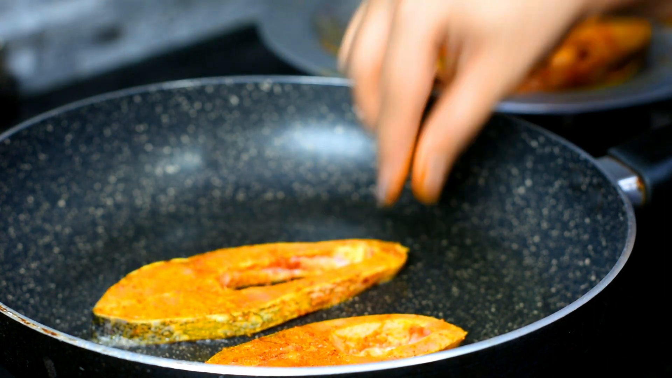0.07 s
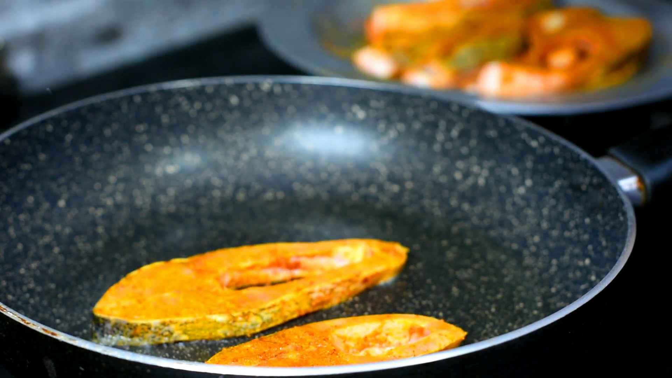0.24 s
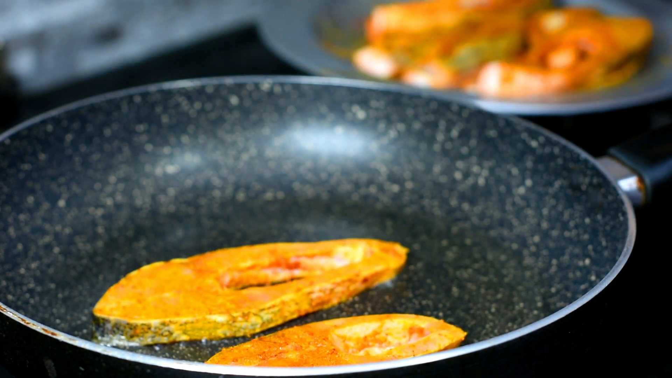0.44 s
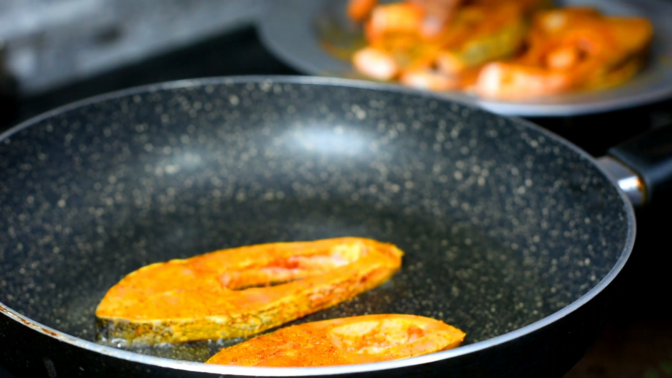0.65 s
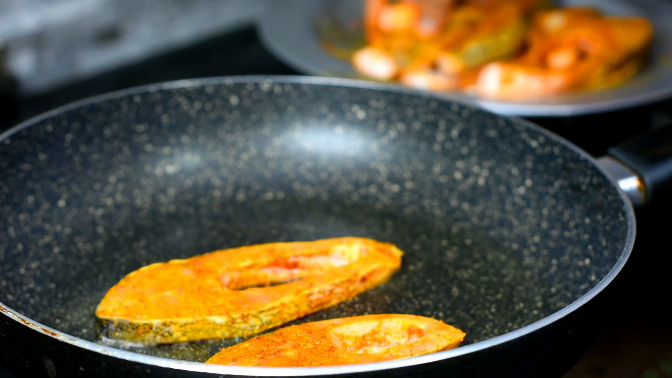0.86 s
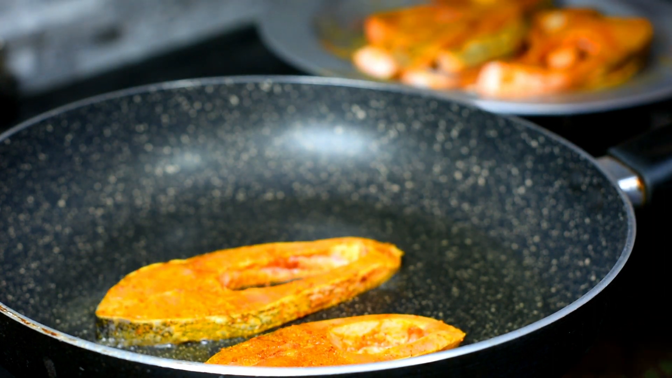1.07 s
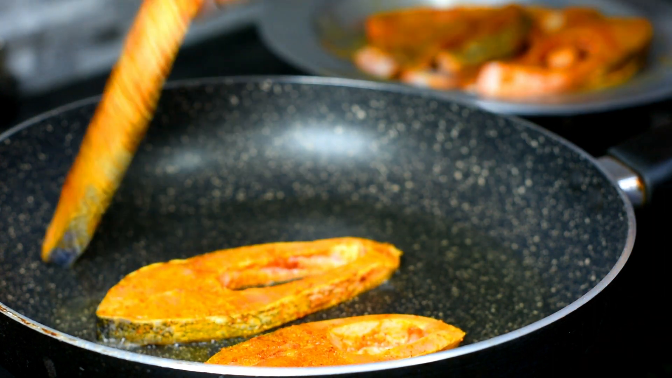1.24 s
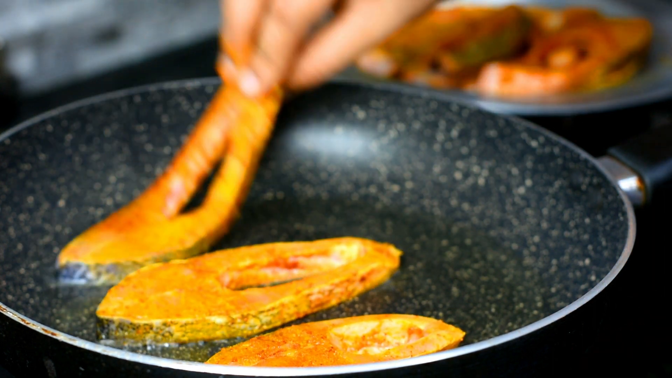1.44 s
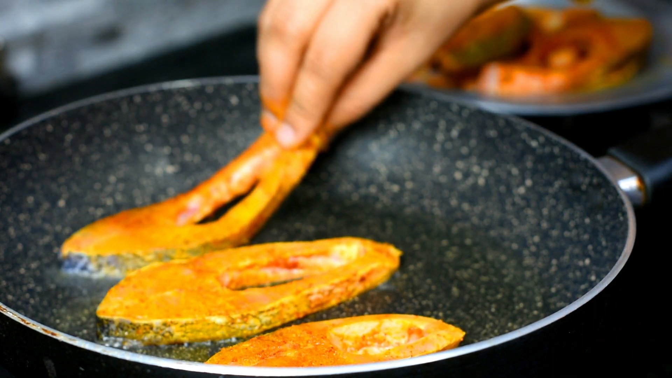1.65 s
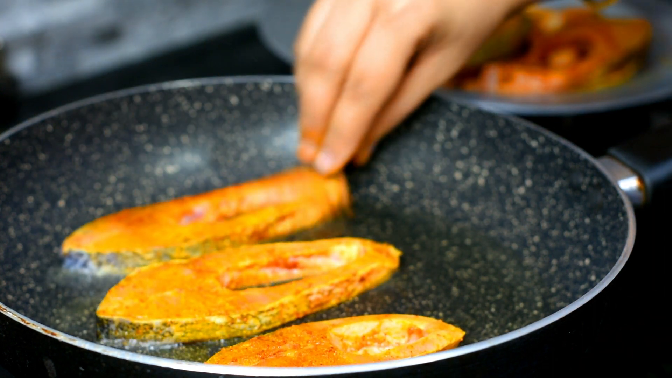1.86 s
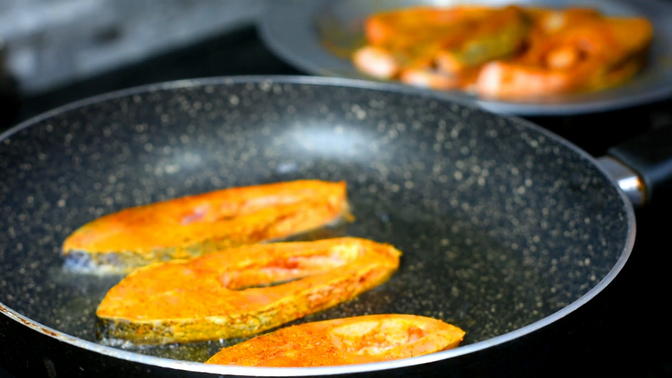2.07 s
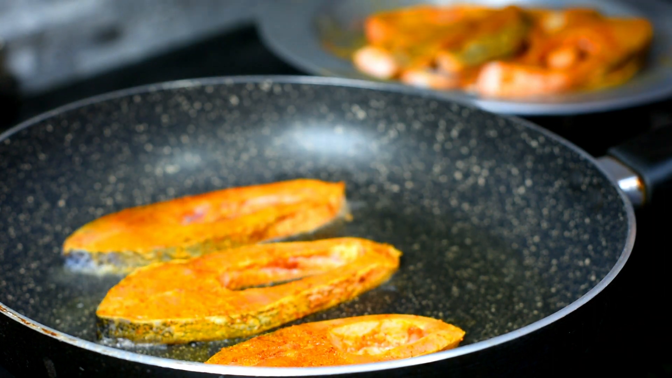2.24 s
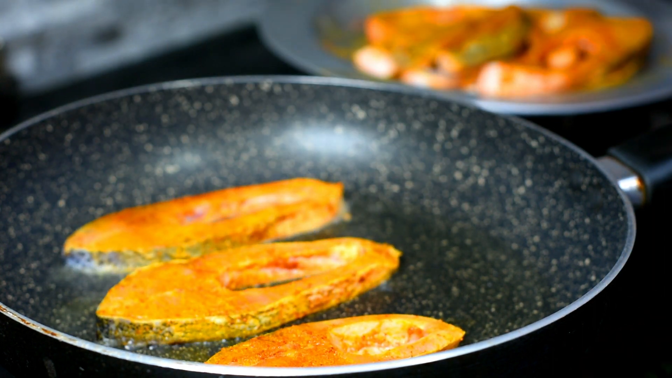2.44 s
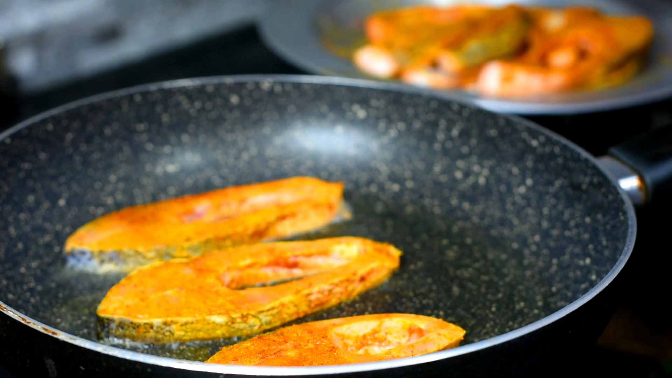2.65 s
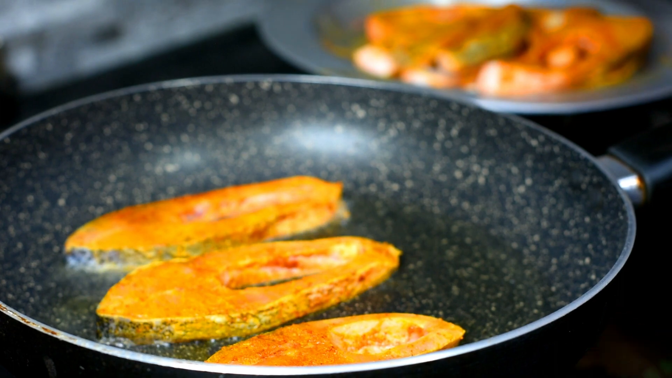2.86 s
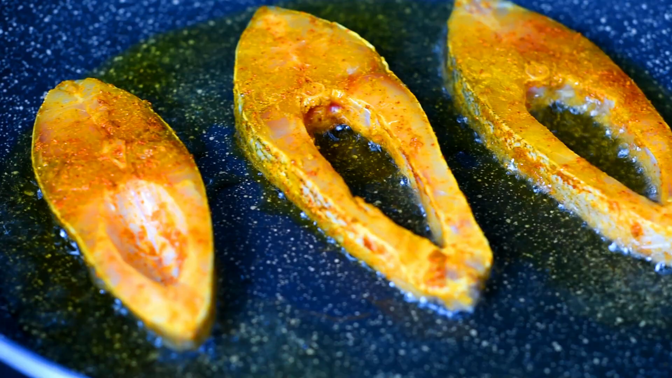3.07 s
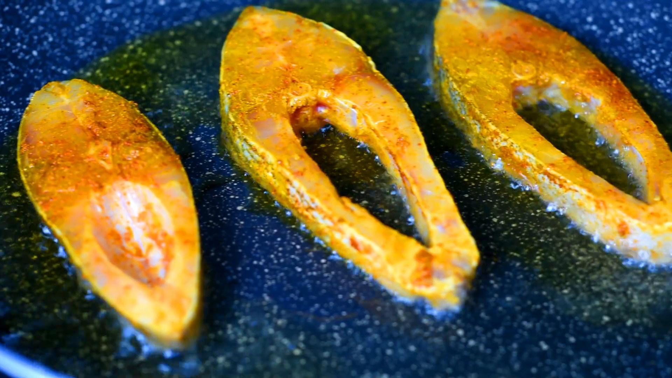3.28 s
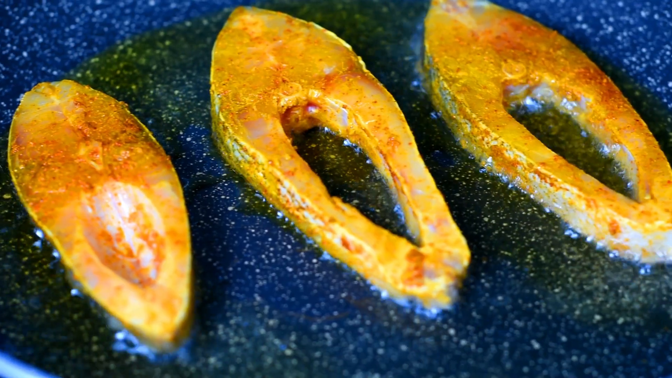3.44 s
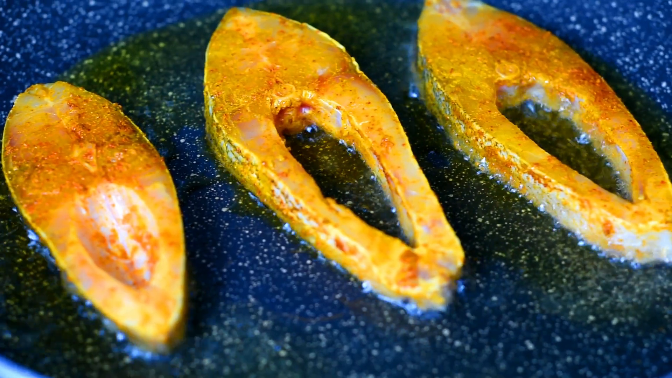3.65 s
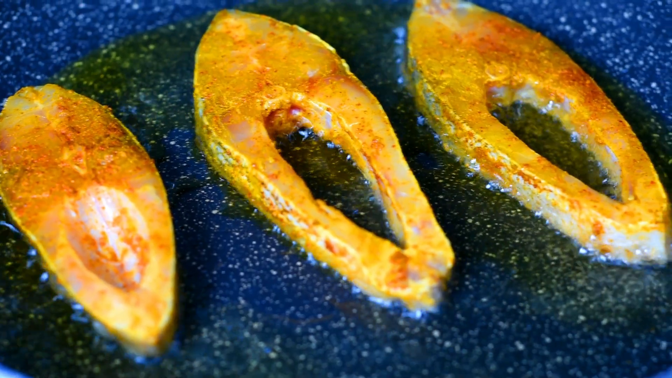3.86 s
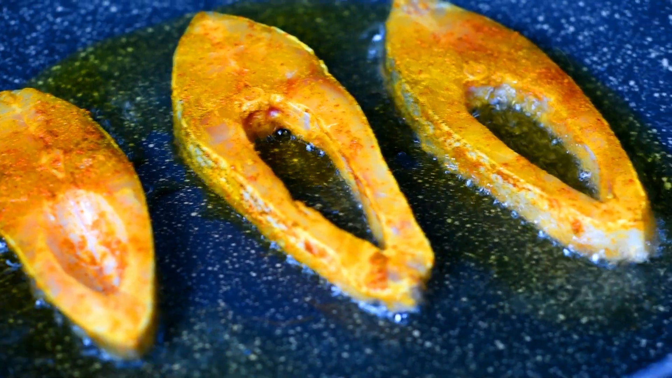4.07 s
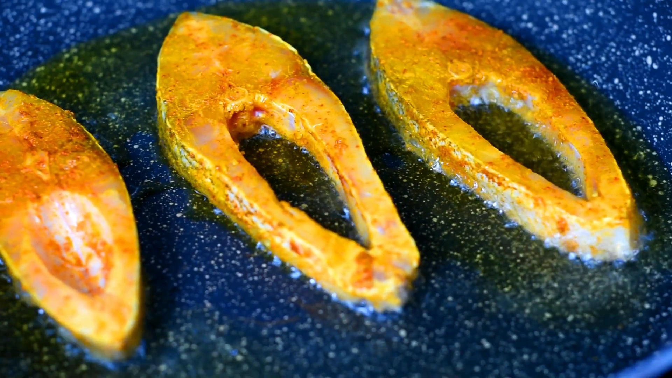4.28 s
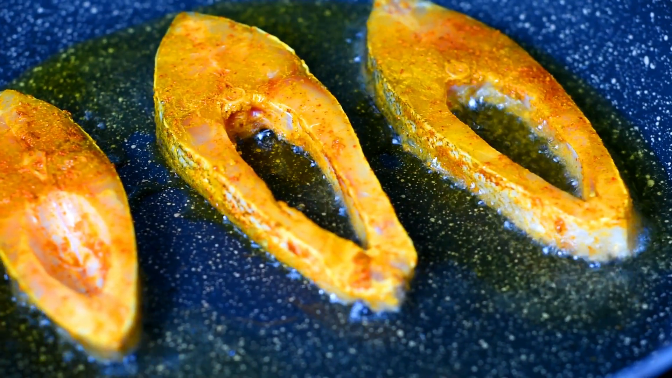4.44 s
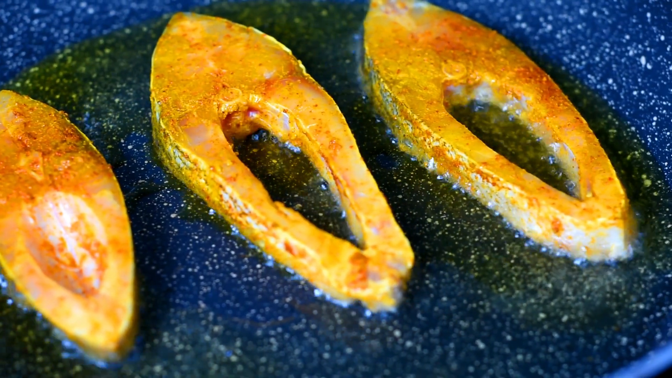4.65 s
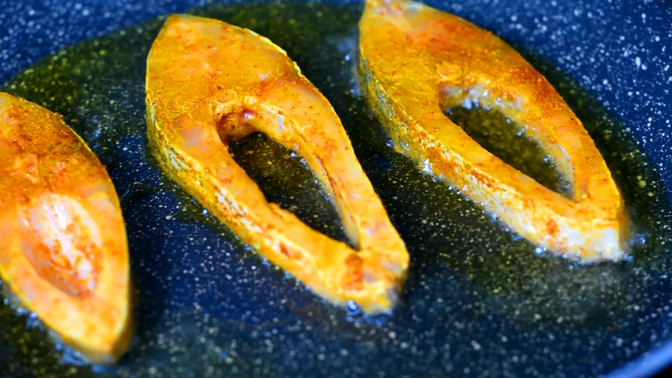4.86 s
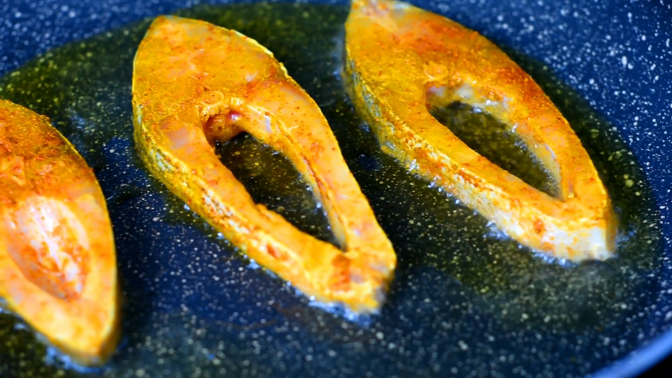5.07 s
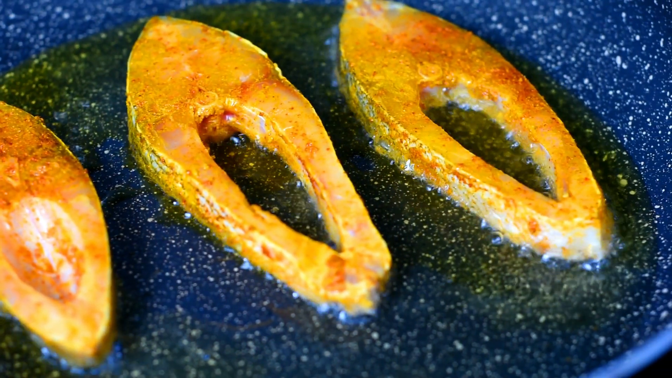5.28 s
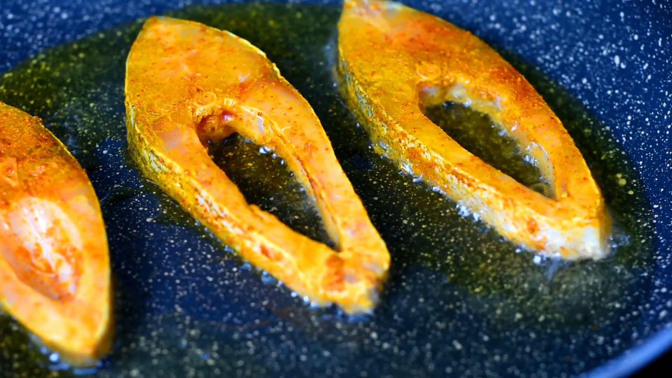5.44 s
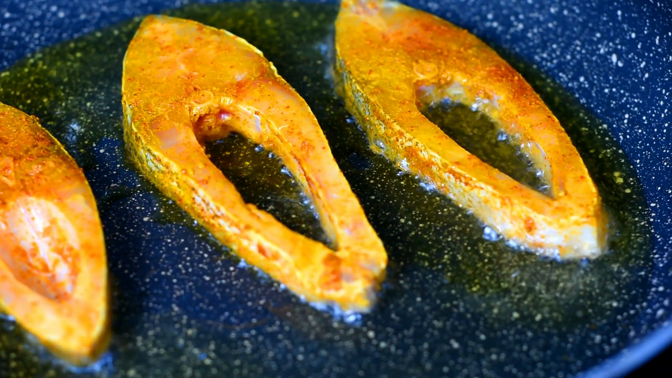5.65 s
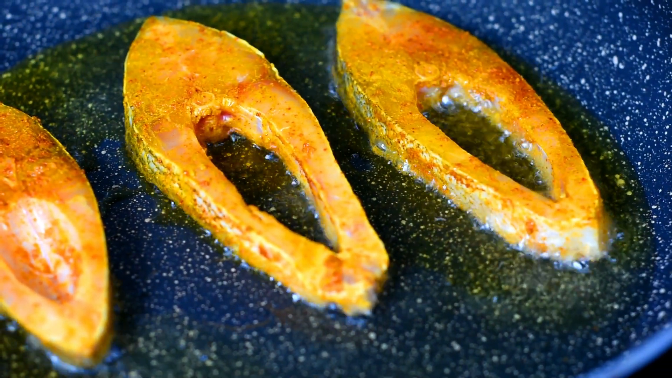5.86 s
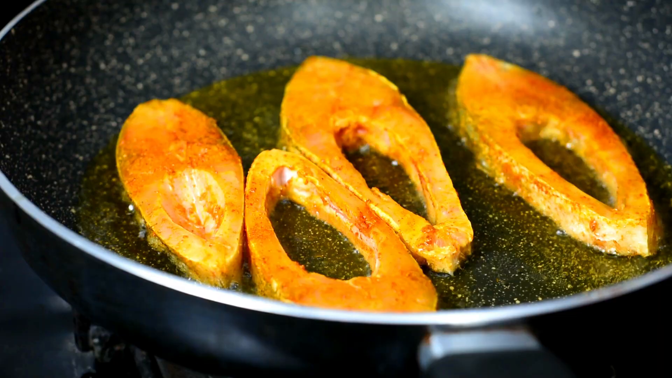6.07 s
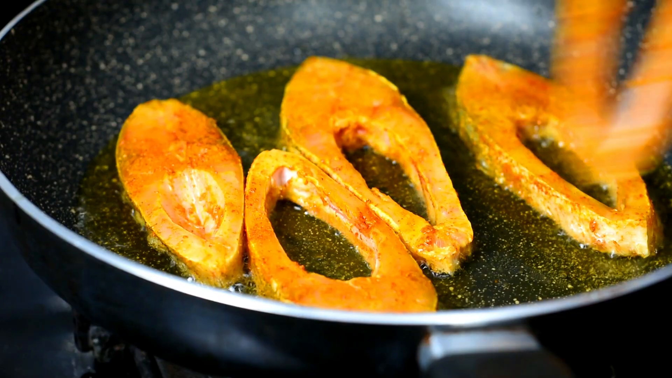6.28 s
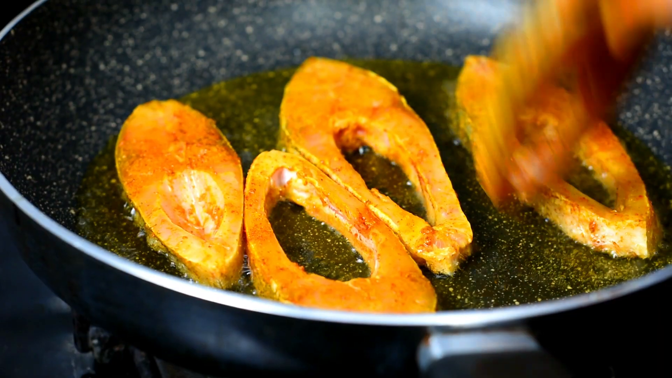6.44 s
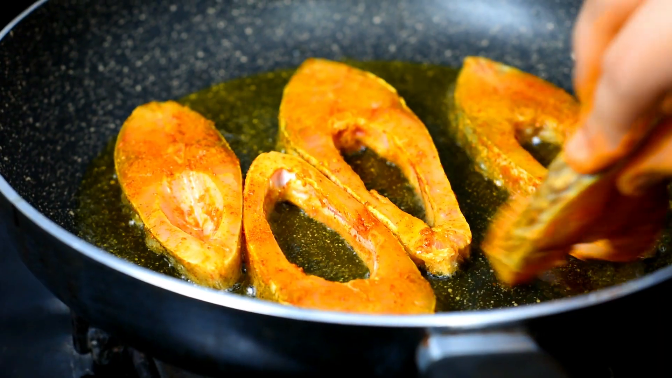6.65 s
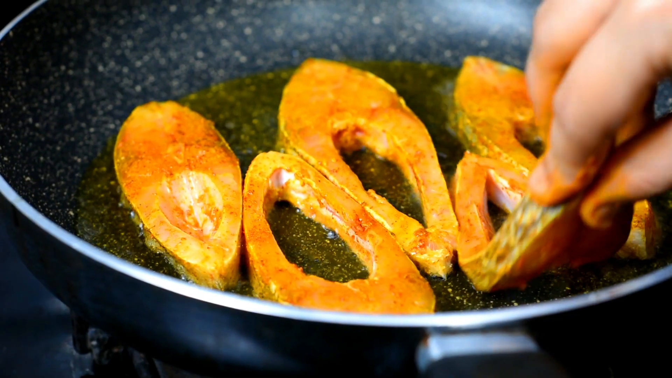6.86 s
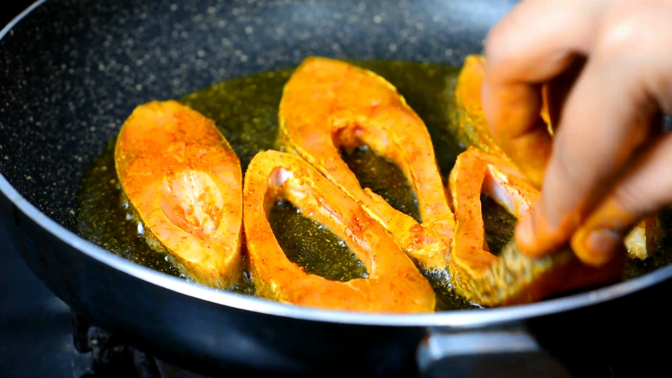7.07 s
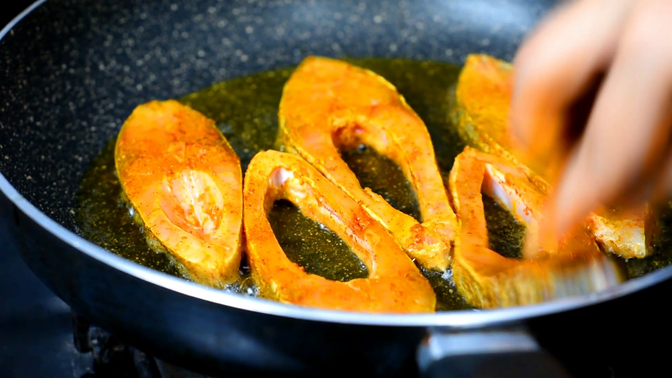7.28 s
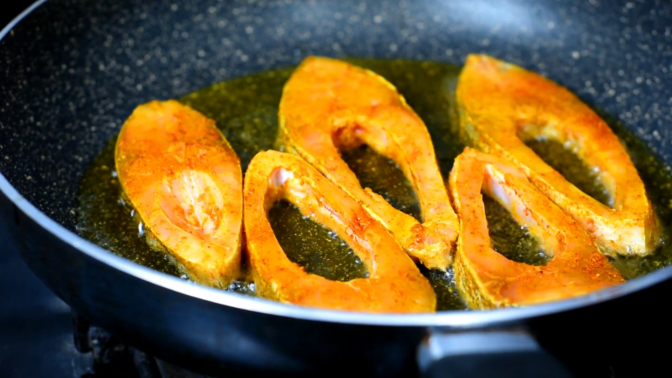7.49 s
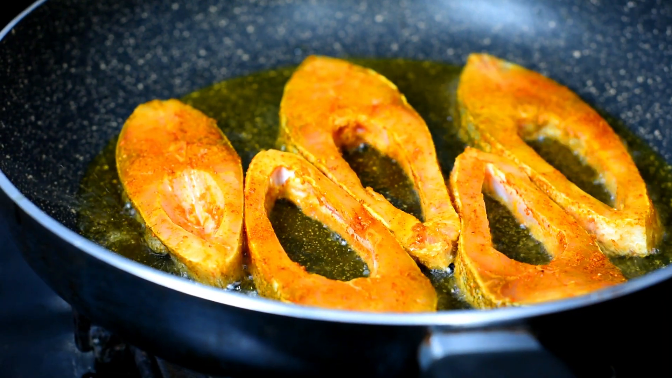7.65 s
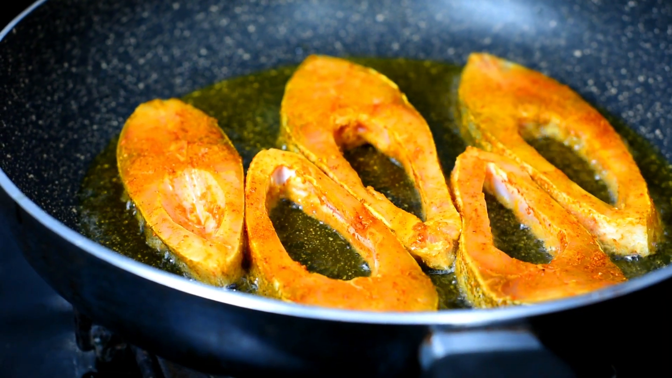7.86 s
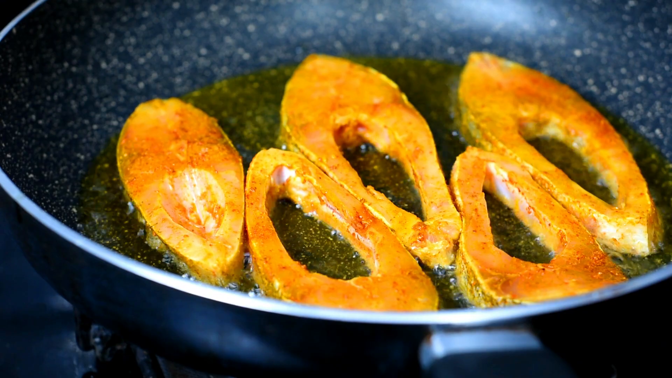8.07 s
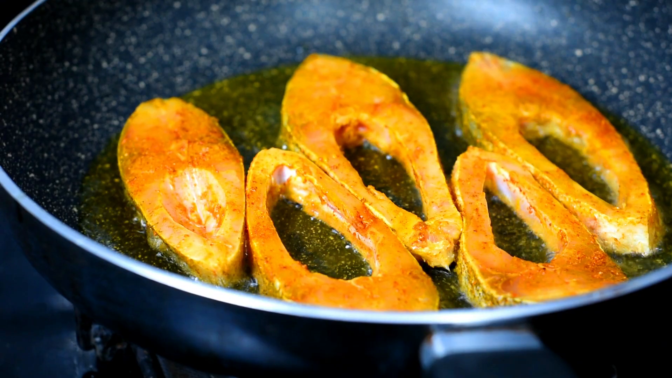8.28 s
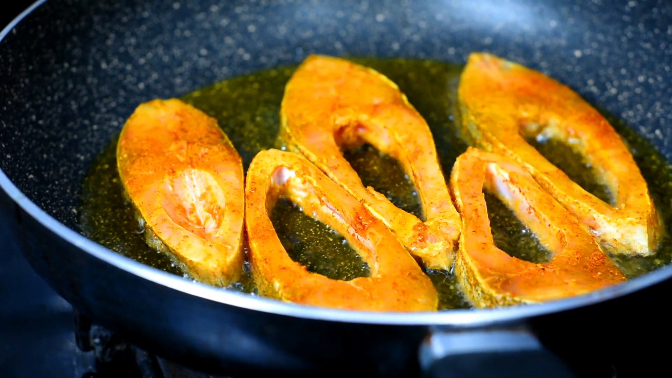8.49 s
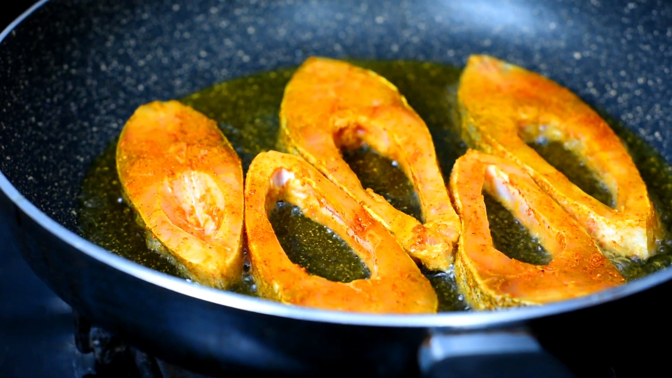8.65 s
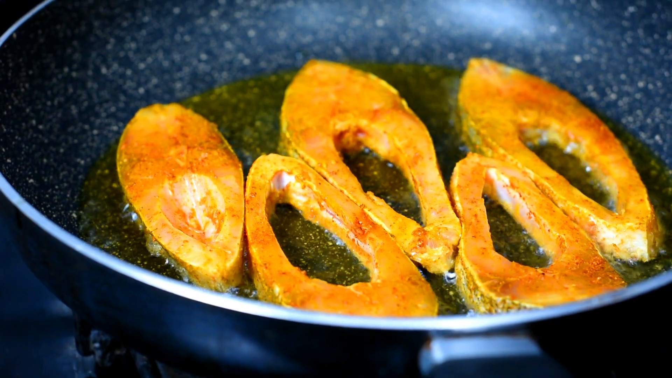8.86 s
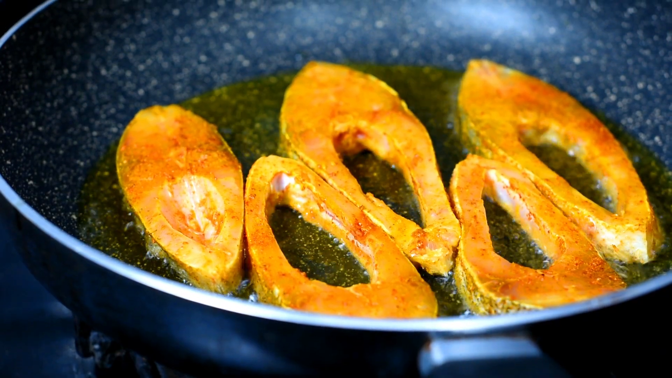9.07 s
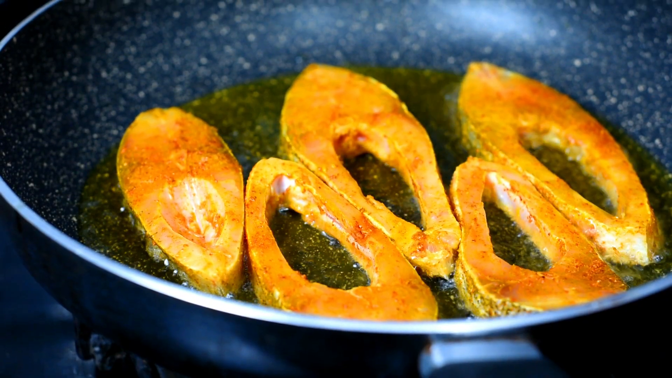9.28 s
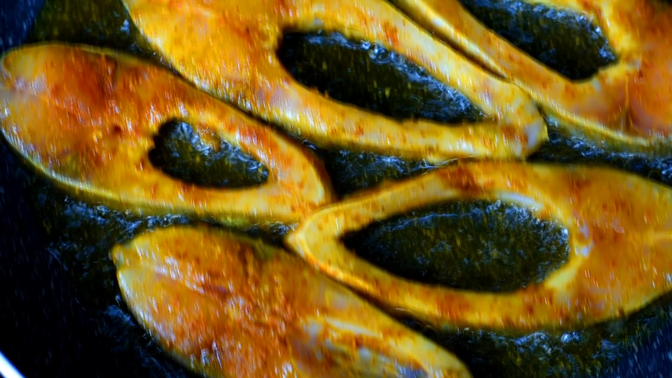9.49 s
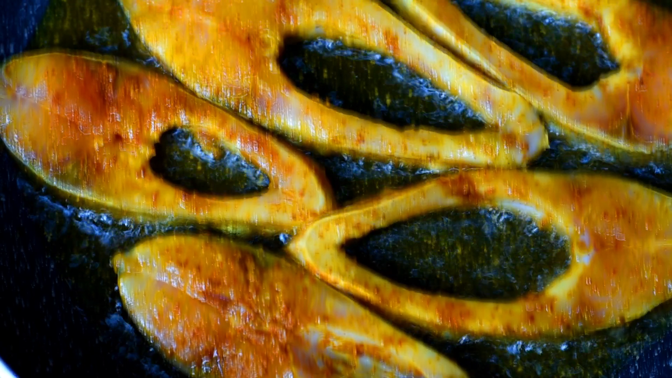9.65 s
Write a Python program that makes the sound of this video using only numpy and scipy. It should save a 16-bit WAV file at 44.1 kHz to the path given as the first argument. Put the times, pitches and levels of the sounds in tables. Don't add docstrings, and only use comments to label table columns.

```python
import sys
import numpy as np
from scipy import signal
from scipy.fft import rfft, irfft, next_fast_len
from scipy.io import wavfile
from scipy.ndimage import uniform_filter1d

SR = 44100
rng = np.random.default_rng(int(sys.argv[2]) if len(sys.argv) > 2 else 0)


def to_linear_factor(level_db):
    exponent = np.asarray(level_db, float) / 20
    return 10 ** exponent


def unload_wav(signal):
    wavfile.write(
        sys.argv[1],
        SR,
        np.round(np.clip(np.atleast_2d(signal).T, -1, 1) * 32767).astype(np.int16),
    )


N = 428652

# [start/s, end/s]
SHOTS = [
    (0, 3.0552),
    (3.0552, 9.4202),
    (9.4592, 9.72),
]
# [t/s, peak level/dB, bubble f/Hz, top octave re peak/dB, knock re peak/dB]
SPITS = [(0.582, -1.5, 4000, -12, -41), (1.0169, -9.5, 6700, -25, -33), (2.7247, -6, 10420, -6, -32),
         (2.921, 5.5, 3420, -22, -37), (2.9287, -2, 3500, -2.5, -57), (3.0993, -1, 8790, -10, -40),
         (3.1437, 9, 5700, -6, -29.5), (3.1475, 4, 5240, -29, -43), (3.2207, -8, 8790, -12, -29.5),
         (3.5379, -17, 3100, -11, -30), (4.125, -5, 7160, -15, -47), (4.2996, -7, 8900, -37, -36.5),
         (4.4814, -9, 8100, -4, -42), (4.4854, -19, 1780, -24, -23), (5.1637, 3, 10340, -2, -41),
         (5.6761, -29.5, 8870, -5, 6.5), (5.6766, 17, 9100, -21, -53), (5.697, 10.5, 6360, -18, -31),
         (5.884, -17, 3270, -5, -28), (6.6452, -15, 10340, -2, -29), (6.65, -8, 8200, -24, -32.5),
         (7.6547, -5.5, 2980, -7, -31), (7.7988, -11, 4600, -6, -21.5), (9.2935, -29, 9220, -6, -32)]
BUBBLE_HZ = np.geomspace(800, 16500, 26)


def rms_one(x):
    return x / np.sqrt(np.mean(x ** 2) + 1e-20)


def in_time(rows):
    s, *columns = np.transpose(rows)
    return [np.interp(np.arange(N) / SR, s, c) for c in columns]


def by_view(rows):
    s, *columns = np.transpose(rows)
    row = np.clip(np.searchsorted(s, np.arange(N) / SR, "right") - 1, 0, None)
    return [c[row] for c in columns]


def at_hz(points, hz):
    f, value = np.transpose(points)
    return np.interp(np.log(hz), np.log(f), value)


def filtered(x, order, hz, kind):
    return signal.sosfilt(signal.butter(order, hz, kind, fs=SR, output="sos"), x)


def drift(rate):
    r = np.exp(-80 * np.pi * rate / SR)
    slow = signal.lfilter([1], [1, -2 * r, r * r], rng.standard_normal(N // 40 + 2002))[2000:]
    return np.interp(np.arange(N) / 40, np.arange(len(slow)), rms_one(slow))


def ring(clicks, hz, t60):
    r, w = to_linear_factor(-60 / (t60 * SR)), 2 * np.pi * hz / SR
    return signal.lfilter([0, np.sin(w)], [1, -2 * r * np.cos(w), r * r], clicks + 1e-18)


def hum(width_hz, hz):
    t60 = 2.2 / width_hz
    rung = ring(ring(rng.standard_normal(N), hz, t60), hz, t60 / 2)
    return rms_one(filtered(rung, 2, .8 * hz, "high"))


def bursts(at, size, pitch_hz, octaves, cycles, colour_db):
    out = np.zeros(N)
    for k, hz in enumerate(BUBBLE_HZ):
        near = np.exp(-.5 * (np.log2(hz / pitch_hz) / octaves) ** 2)
        clicks = np.bincount(at, size * near * to_linear_factor(colour_db[k]), N)
        out += ring(clicks, hz, cycles / hz) * (-1) ** k
    return out


def crack(at, size):
    return filtered(np.bincount(at, size, N), 2, 2300, "high")


def fry():
    # [t/s, level/dB, wetness as dull fizz re bright/dB]
    heat = [(0, -30.5, -7.5), (0.485, -31.5, -7.5), (0.52, -37, -5.5), (1.24, -38.5, -4.5),
            (1.46, -33.5, -5.5), (1.9, -26.5, -4.5), (2.6, -28, -6), (2.9, -31, -4.5), (3.054, -29.5, -7),
            (3.057, -43.5, -3), (3.6, -39.5, -7), (4.94, -40, -10.5), (5.95, -39.5, -10), (6.03, -42, -8.5),
            (7.05, -39.5, -2.5), (7.3, -36, -2.5), (9.415, -39, -2.5), (9.462, -41, -9)]
    # [t/s, lift/dB, extra wetness/dB, rise/s, fade/s]
    flares = [(0.6, 1.5, 4.5, 0.032, 0.053), (1.31, 9, -12, 0.025, 0.096), (1.473, 5.5, -4, 0.005, 0.069),
              (2.95, 0.5, 5.5, 0.049, 0.056), (3.16, 5, 5, 0.029, 0.069), (5.0, 0.5, 1, .03, 0.062),
              (5.19, 6.5, 6, 0.034, 0.053), (5.69, 4.5, 7, 0.006, 0.092), (6.68, 4.5, 3.5, 0.042, 0.063),
              (6.76, 7.5, -4.5, 0.098, 0.19), (7.66, 2.5, 1.5, 0.012, 0.11), (9.6, 1.5, -2, 0.075, 0.25)]
    level_db, wet_db = in_time(heat)
    t = np.arange(N) / SR
    for s, lift_db, extra_db, rise_s, fade_s in flares:
        rise = np.clip(1 + (t - s) / rise_s, 0, 1)
        fade = np.exp(-((t - s) / fade_s) ** 2)
        shape = np.where(t < s, rise, fade)
        level_db, wet_db = level_db + lift_db * shape, wet_db + extra_db * shape
    return level_db, level_db + wet_db


def swarm(per_s, clump_db, clump_rate, spread_db, octaves, cycles, colour_db, dull_db):
    at = np.flatnonzero(rng.random(N) < per_s * to_linear_factor(clump_db * drift(clump_rate)) / SR)
    pitch_hz = rng.uniform(BUBBLE_HZ[0], BUBBLE_HZ[-1], len(at))
    size = to_linear_factor(spread_db * np.minimum(rng.exponential(1, len(at)), 3.1)) * rng.choice([-1, 1], len(at))
    dullness = np.clip(np.log2(5500 / pitch_hz), 0, 1)
    size = size * to_linear_factor(dullness * dull_db[at])
    return rms_one(bursts(at, size, pitch_hz, octaves, cycles, colour_db))


def sizzle(bright_db, dull_db):
    # [f/Hz, level per Hz/dB]
    colour = [(410, -49), (700, -19), (1520, -12), (1670, -10), (2250, -8), (4830, -2), (10400, -4),
              (15500, -11)]
    colour_db = at_hz(colour, BUBBLE_HZ) + 10 * np.log10(BUBBLE_HZ / 5000)
    tilt_db = dull_db - bright_db + 6.0
    fizz = swarm(per_s=20000, clump_db=2.2, clump_rate=14, spread_db=0.38, octaves=0.15, cycles=23.0,
                 colour_db=colour_db, dull_db=tilt_db)
    crackle = swarm(per_s=600, clump_db=3.0, clump_rate=14, spread_db=3.6, octaves=.35, cycles=8.0,
                    colour_db=colour_db, dull_db=tilt_db)
    return to_linear_factor(bright_db - 5.0) * fizz, to_linear_factor(bright_db - 10.0) * crackle


def needles(bright_db):
    # [from t/s, level above the fizz/dB]
    views = [
        (0, 5),
        (3.055, 11),
        (6.02, 9),
        (6.7, 7),
    ]
    per_s, spread_db = 260, 4.0
    size = to_linear_factor(spread_db * np.minimum(rng.exponential(1, N), 2.5)) * rng.choice([-1, 1], N)
    born = rng.random(N) < per_s * to_linear_factor(5.0 * drift(10)) / SR
    return to_linear_factor(bright_db + by_view(views)[0]) * filtered(size * born + 1e-18, 2, 4500, "high")


def air():
    # [f/Hz, level per Hz/dB]
    colour = [(71, -53), (120, -19.5), (242, -5), (468, -5.5), (950, 3.5), (1850, 4), (3000, 0), (3900, 5)]
    # [from t/s, upper level/dB, lower level/dB, rumble level/dB]
    views = [
        (0, -53, -57.5, -66),
        (3.055, -56, -65, -72),
        (6.02, -59.5, -66, -73.5),
        (9.44, -59.5, -68.5, -69),
    ]
    upper_db, lower_db, rumble_db = by_view(views)
    hz = np.maximum(np.fft.rfftfreq(N, 1 / SR), 1)
    spectrum = rfft(rng.standard_normal(N)) * to_linear_factor(at_hz(colour, hz)) / (1 + (hz / 4200) ** 12)
    low = 1 / (1 + (hz / 550) ** 4)
    lower = to_linear_factor(lower_db - 3.5) * rms_one(irfft(spectrum * low, N))
    upper = to_linear_factor(upper_db + 5.5) * rms_one(irfft(spectrum * (1 - low), N))
    rumble = rms_one(filtered(rng.standard_normal(N), 2, 130, "low"))
    return to_linear_factor(1.0 * drift(4.7)) * (lower + upper) + to_linear_factor(rumble_db - 13.0) * rumble


def drops():
    # [t/s, peak level/dB, bubble f/Hz]
    snaps = [(0.015, -4, 8800), (1.4858, -22, 10420), (2.142, -14, 10340), (3.4197, -10.5, 8440),
             (3.668, -17, 10510), (3.703, -8, 2020), (3.727, -14, 12320), (3.9073, -23, 9390),
             (4.0093, -9.5, 10510), (4.13, -8, 10340), (4.244, -18, 9470), (4.304, -8, 11280),
             (4.358, -14, 8790), (4.411, -8, 12580), (4.555, -8, 8610), (4.613, -10, 9040),
             (4.8807, -22, 7840), (4.962, -10, 5510), (4.977, -2.5, 12060), (5.3286, -13, 12230),
             (5.641, -13, 10510), (5.8273, 1, 10900), (7.018, -14, 7300), (7.6394, -14, 6550),
             (7.7196, -5, 11200), (8.377, -19, 12400), (8.381, -14, 12490), (8.535, -16, 9910),
             (9.3493, -28, 7410), (9.4717, -22, 9910)]
    # [t/s, peak level/dB, bubble f/Hz]
    plops = [(1.2606, -14, 3020), (1.6417, -14, 3260), (1.818, 0, 4600), (2.783, 5, 10200),
             (3.126, -7, 7060), (3.32, -12, 9900), (3.5566, -7, 7540), (3.6426, -10, 10080),
             (3.8025, -16, 6890), (3.8946, -14, 7320), (4.0597, -5, 8100), (4.202, -5.5, 8350),
             (4.3345, -10, 6600), (4.381, -10, 10510), (4.5344, -15, 5700), (4.778, -17, 8790),
             (5.59, -11, 5530), (5.7278, -8, 5200), (5.7314, 3, 9130), (5.957, -11, 11020),
             (6.1189, -16, 8260), (6.2836, -17, 8790), (6.3388, -20, 9040), (6.4437, -8.5, 7300),
             (6.5283, -11, 8960), (6.7224, -7, 5600), (8.2472, -6.5, 5630), (9.1663, -6, 9300),
             (9.3947, -13, 8700), (9.5583, -12, 8560)]
    snap_top_db, plop_top_db, light_knock_db = -9, -14.5, -50
    return (SPITS + [(*row, snap_top_db, light_knock_db) for row in snaps]
            + [(*row, plop_top_db, light_knock_db) for row in plops])


def spits():
    # [f/Hz, level/dB, t60/s]
    pan_modes = [(374, -4.5, 0.0097), (550, -8, 0.021), (752, -2, 0.016), (856, -2.5, 0.012),
                 (1055, 1, 0.011), (1380, 6.5, 0.0025), (1730, 1, 0.0061), (2120, -8.5, 0.015)]
    crack_top = .5
    s, peak_db, pitch_hz, top_db, knock_db = np.transpose(drops())[:, :, None]
    draw = rng.random((4, len(s), 30))
    lag = .0006 + .03 * draw[0] ** 2.2
    fall_db = -12.0 - 1500 * lag - 9.0 * draw[1]
    lag[:, 0], fall_db[:, 0] = 0, 0
    size = crack_top * np.tanh(to_linear_factor(peak_db + fall_db - 2.0) / crack_top) * np.sign(draw[2] - .5)
    at = np.minimum(((s + lag) * SR).astype(int), N - 1).ravel()
    sharp = np.clip(to_linear_factor(top_db + 6.5), 0, 1)
    own_hz = pitch_hz * 2 ** (0.076 * (draw[3] - .5))
    pop = bursts(at, (size * (1.15 - sharp)).ravel(), own_hz.ravel(), octaves=0.25, cycles=22.0,
                 colour_db=0 * BUBBLE_HZ - 5.5)
    knock = 0
    for k, (hz, level_db, ring_s) in enumerate(pan_modes):
        own_db = rng.normal(0, 1.5, size.shape)
        hit = size * to_linear_factor(knock_db + level_db + 9.5 + own_db)
        knock = knock + ring(np.bincount(at, hit.ravel(), N), hz, ring_s) * (-1) ** k
    return pop + crack(at, (size * sharp * to_linear_factor(6.5)).ravel()) + knock


def beads():
    # [t/s, peak level/dB, f/Hz]
    early = [(0.041, -20.5, 6840), (0.088, -36, 2250), (0.222, -37, 2200), (0.315, -34, 2300),
             (0.1398, -20.5, 6840), (0.6425, -25, 13576), (0.7473, -23, 11416), (0.9828, -22, 13576),
             (1.0865, -21, 13576), (1.111, -22, 9600), (1.1559, -36, 4800), (1.1788, -35, 4800),
             (1.2853, -30, 2110), (1.323, -25, 9600), (1.331, -25, 13576), (1.3923, -30, 11416),
             (1.4839, -14, 9900), (1.4891, -20, 11416), (1.517, -33, 6788), (1.5714, -19, 13400),
             (1.643, -26, 6900), (1.7116, -23, 9600), (2.0363, -17, 8000), (2.0764, -18, 8140),
             (2.1707, -15.5, 9450), (2.3343, -17, 11416), (2.4068, -19.5, 4830), (2.4539, -13, 11416),
             (2.4943, -18.5, 6850), (2.551, -22, 9600), (2.7536, -18.5, 11416), (2.7835, -22, 9600),
             (2.9289, -8.9, 11000), (2.999, -35.5, 1400), (3.002, -24, 6788), (3.031, -24, 9600),
             (3.043, -16.5, 9600), (3.127, -24, 6740), (3.1446, -26, 11600), (3.1868, -29.1, 13576),
             (3.2985, -33.0, 13576), (3.325, -29, 8072), (3.39, -35, 4036), (3.4444, -24, 11416),
             (3.5373, -45, 1697), (3.668, -20, 11416), (3.741, -42, 1500), (3.7325, -29, 6788),
             (3.745, -25, 11400), (3.754, -39, 1710), (3.814, -31, 4060), (3.863, -26, 9600),
             (3.8877, -33, 6788), (3.8946, -24.5, 13576), (3.9066, -26, 13500), (3.9128, -24, 9600),
             (3.9216, -31, 8072), (4.0458, -35, 2880), (4.0732, -23, 8200), (4.125, -38, 1430),
             (4.1311, -11, 13500)]
    middle = [(4.2618, -30.2, 11416), (4.2704, -28.2, 8072), (4.2934, -33, 5708), (4.3322, -37, 1600),
              (4.391, -29.9, 13576), (4.399, -32.5, 13576), (4.4045, -31.6, 13576), (4.4264, -29.1, 9600),
              (4.5038, -36, 1750), (4.5347, -23, 13576), (4.5696, -28, 13576), (4.6055, -37, 3380),
              (4.625, -30, 4930), (4.6735, -25, 13576), (4.7312, -37, 13576), (4.7402, -25, 13576),
              (4.7627, -33.6, 13576), (4.776, -28, 9600), (4.7956, -26, 13576), (4.8021, -31, 13576),
              (4.8151, -30, 13576), (4.8345, -28.4, 9600), (4.8418, -31, 4800), (4.8545, -33.5, 13576),
              (4.881, -19, 13576), (4.9702, -25, 9600), (4.977, -15, 13576), (4.9862, -38, 2000),
              (5.008, -40, 1697), (5.064, -42, 1220), (5.065, -29, 9600), (5.1772, -25, 4770),
              (5.1907, -30, 13576), (5.2176, -33, 13576), (5.3233, -43, 1450), (5.3588, -30, 13576),
              (5.3853, -28.1, 13576), (5.423, -32, 9600), (5.4416, -33, 13576), (5.501, -33, 13576),
              (5.5366, -25.5, 5740), (5.5598, -48, 1210), (5.5892, -21, 9200), (5.6157, -24, 13576),
              (5.713, -30, 1710), (5.924, -32, 5708), (5.952, -42, 1427), (5.952, -32.9, 13576),
              (6.0153, -28, 11416), (6.119, -30, 8000), (6.168, -37, 4036), (6.1879, -37, 6788),
              (6.195, -31, 8072), (6.2234, -36, 6788), (6.2573, -40, 3394), (6.2867, -25, 13576),
              (6.3388, -24.5, 9400), (6.367, -31.1, 8072)]
    late = [(6.377, -34.2, 11416), (6.389, -29, 9400), (6.4927, -33.9, 13576), (6.5486, -29, 13500),
            (6.593, -31, 8072), (6.7527, -29, 11416), (6.7653, -25, 4770), (6.9083, -31.6, 13576),
            (6.9672, -26, 5708), (7.1797, -36, 8072), (7.1867, -35, 6788), (7.1971, -28.2, 13576),
            (7.219, -28.5, 5960), (7.2725, -20, 13576), (7.2933, -25, 6950), (7.4326, -25.5, 4100),
            (7.483, -27, 6788), (7.49, -30.2, 13576), (7.4985, -29, 6750), (7.6245, -28, 4760),
            (7.6396, -28, 11416), (7.6536, -30, 11416), (7.6651, -25, 8072), (7.6741, -38, 1200),
            (7.695, -26, 6788), (7.8297, -39, 1200), (7.898, -24, 11416), (7.9424, -26, 8072),
            (8.084, -31, 8072), (8.1035, -30, 6788), (8.1613, -31, 4840), (8.277, -26, 8000),
            (8.3796, -18, 11416), (8.5275, -21, 11416), (8.556, -38.7, 1680), (8.726, -29, 4750),
            (8.779, -26, 8072), (8.8155, -25, 13576), (8.861, -24.5, 7850), (8.8988, -29, 9600),
            (8.9202, -29.9, 13576), (9.0005, -33.0, 13576), (9.0669, -31.7, 13576), (9.096, -28.5, 2730),
            (9.224, -26, 4100), (9.1108, -31, 4500), (9.1592, -31.6, 13576), (9.2929, -23, 13576),
            (9.3502, -25.3, 11416), (9.372, -30.9, 5750), (9.386, -27, 8072), (9.4001, -32, 13576),
            (9.4974, -37, 5708), (9.5313, -33, 11416), (9.608, -35.5, 4036), (9.6206, -32, 6788),
            (9.6346, -29.5, 8100), (9.663, -34, 6788), (9.697, -39, 4000)]
    fall_cycles, glide_per_cycle, lift_db = 5.3, 0.024, 5
    s, peak_db, pitch_hz = np.transpose(early + middle + late)[:, :, None]
    step = np.arange(SR // 50)
    cycles = step / SR * pitch_hz
    height = to_linear_factor(peak_db + lift_db - 3.0 * (pitch_hz > 11000)) * np.exp(-cycles / fall_cycles)
    glide = 0.89 + np.minimum(glide_per_cycle * cycles, .2)
    shape = height * np.sin(2 * np.pi * cycles * glide)
    return np.bincount(((s * SR).astype(int) + step).ravel(), shape.ravel(), N + SR)[:N]


def ticks():
    # [t/s, peak level/dB]
    lone = [(0.222, -8.5), (1.136, -20), (1.8185, -8.5), (2.044, -6.5), (2.551, -12), (2.849, -27),
            (3.3587, -22.5), (3.422, -21), (3.598, -17), (4.012, -17), (4.074, -17.5), (4.3545, -18),
            (4.438, -18), (4.651, -16), (4.8666, -22), (5.6965, -17), (5.3813, -19), (5.793, -17),
            (5.907, -19), (5.9395, -16), (6.394, -23), (6.526, -21), (6.9673, -28), (5.7314, -11),
            (7.2054, -20), (7.659, -9), (7.915, -16.5), (8.669, -15), (8.7682, -24), (8.864, -29),
            (9.0757, -25)]
    s, peak_db = np.transpose(lone)
    at, draw = (s * SR).astype(int), rng.random((len(s), 2))
    size = to_linear_factor(peak_db) * np.sign(draw[:, 0] - .5)
    rung = bursts(at, size, 5000 * 2 ** (3.9 * draw[:, 1]), octaves=0.35, cycles=140.0,
                  colour_db=0 * BUBBLE_HZ - 12.0)
    return crack(at, size * to_linear_factor(7.0)) + rung


def thuds():
    s, peak_db, _, _, knock_db = np.transpose(SPITS)
    knocks = np.bincount((s * SR).astype(int), to_linear_factor(peak_db + knock_db - 16.5), N)
    return filtered(ring(knocks, hz=277, t60=0.019), 2, 140, "high")


def drones():
    # [start/s, end/s, f/Hz, width/Hz, level/dB]
    far = [(0.88, 1.21, 236, 17, -59.5), (1.15, 1.4, 102, 14, -70), (2.152, 2.32, 220, 8.8, -59.5),
           (3.86, 4.2, 185, 37, -67), (1.4, 2.8, 117, 30, -75.5), (2.06, 2.59, 425, 71, -57),
           (8.55, 9.47, 125, 16, -78.5), (5.1, 5.3, 250, 38, -65), (6.7, 6.85, 310, 26, -65),
           (3.878, 4.15, 258, 60, -66), (6.1, 7.5, 130, 16, -79), (9.08, 9.283, 460, 8, -64),
           (9.092, 9.4, 229, 16, -73), (9.28, 9.41, 670, 14, -64)]
    t, out = np.arange(N) / SR, np.zeros(N)
    for start, end, hz, width_hz, db in far:
        swell = np.sin(np.pi * np.clip((t - start) / (end - start), 0, 1))
        out += to_linear_factor(db) * swell * hum(width_hz, hz)
    return out


def pops():
    # [t/s, peak level/dB, f/Hz]
    round_bubbles = [(1.2855, -16, 2130), (1.3044, -27, 2120), (1.3374, -15, 5140), (1.3708, -14, 5670),
                     (1.728, -9, 5630), (1.893, -8.5, 4030), (2.849, -11, 5150), (2.9397, -13, 3680),
                     (5.86, -16, 6800), (8.16, -21, 4400), (3.27, -17, 4500), (4.043, -28, 2850),
                     (4.636, -20, 3900), (5.379, -12, 5000), (8.484, -16.5, 3650), (5.677, -8.5, 4520)]
    s, peak_db, pitch_hz = np.transpose(round_bubbles)[:, :, None]
    draw = rng.random((3, len(s), 8))
    lag = 0.01 * draw[0] ** 2.0
    lag[:, 0] = 0
    size = to_linear_factor(peak_db + 2.5 - 4.9 * (lag > 0) - 1100 * lag) * np.sign(draw[1] - .5)
    own_hz = pitch_hz * 2 ** (0.47 * (draw[2] - .5))
    at = ((s + lag) * SR).astype(int)
    return bursts(at.ravel(), size.ravel(), own_hz.ravel(), octaves=.16, cycles=14.0,
                  colour_db=0 * BUBBLE_HZ - 3.0)


def shoves():
    # [t/s, low modes level/dB, high modes re low/dB]
    pushes = [
        (2.59, -44, -1.5),
        (2.77, -40, -5),
        (2.9, -54, -8),
    ]
    rise_db_per_s, fade_db_per_s = 302, 49
    s, low_db, high_db = np.transpose(pushes)[:, :, None]
    t = np.arange(N) / SR
    late = t - s
    bite_db = np.minimum(rise_db_per_s * late, -fade_db_per_s * late)
    low = to_linear_factor(low_db + bite_db) * (t < SHOTS[0][1])
    return low.max(axis=0), (low * to_linear_factor(high_db)).max(axis=0)


def plate():
    # [f/Hz, width/Hz, level/dB]
    low_modes = [(420, 35, 5), (491.4, 22, 3), (531, 30, -3), (575, 70, 5), (733, 220, 3)]
    # [f/Hz, width/Hz, level/dB]
    high_modes = [(957, 60, 0), (1040, 40, -3), (1064, 200, 5), (1346, 60, -4)]
    low_gain, high_gain = shoves()
    grit = to_linear_factor(0.37 * drift(17))
    low = sum(to_linear_factor(db) * hum(width_hz, hz) for hz, width_hz, db in low_modes)
    high = sum(to_linear_factor(db) * hum(width_hz, hz) for hz, width_hz, db in high_modes)
    low = filtered(low, 6, 375, "high")
    low = low / np.sqrt(uniform_filter1d(low ** 2, SR // 30))
    return grit * (low_gain * rms_one(low) + high_gain * rms_one(high))


def whistle():
    # (start/s, end/s, from f/Hz, to f/Hz, level/dB)
    climb = (8.5, 9, 2480, 2748, -48)
    start, end, from_hz, to_hz, db = climb
    t = np.arange(N) / SR
    way = np.clip((t - start) / (end - start), 0, 1)
    hz = from_hz + (to_hz - from_hz) * np.sqrt(way)
    tone = np.sin(np.pi * way) * np.sin(2 * np.pi * np.cumsum(hz) / SR)
    return to_linear_factor(db + 3.0 * drift(40)) * tone * (t < SHOTS[1][1])


def hollow(x, peaks):
    size = next_fast_len(len(x))
    hz = np.fft.rfftfreq(size, 1 / SR)
    lift_db = sum(db / (1 + (2 * (hz - top_hz) / width_hz) ** 2) for top_hz, width_hz, db in peaks)
    return irfft(rfft(x, size) * to_linear_factor(lift_db + 0.5), size)[:len(x)]


def kitchen_echo():
    # [f/Hz, t60/s]
    decay = [(300, 0.3), (800, 0.21), (2500, 0.23), (6000, 0.08), (14000, 0.1)]
    t = np.arange(SR // 2) / SR
    tail = np.zeros(len(t))
    for hz in 80 * 2. ** np.arange(8):
        band = filtered(rng.standard_normal(len(t)), 2, [hz, min(2 * hz, 20000)], "band")
        tail += band * to_linear_factor(-60 * t / at_hz(decay, np.sqrt(2) * hz))
    tail = tail * np.clip((t - .001) / 0.00011, 0, 1)
    return tail / np.sqrt(np.sum(tail ** 2))


def echoed(x):
    return signal.fftconvolve(x, kitchen_echo())[:len(x)]


def scene():
    # [f/Hz, width/Hz, lift/dB]
    hollows = [
        [(2215, 650, 4.5), (1750, 100, -5.5), (3190, 140, 8.5), (5000, 1600, 2.5), (7640, 1100, 4.5),
         (9900, 1500, 3), (13360, 2600, 6.5)],
        [(2610, 120, 2), (4000, 520, 1.5), (8200, 3700, 2), (13900, 1900, 3)],
        [(3940, 690, 3)],
    ]
    crackle_levels = [-1.5, 3, 1.5]
    limit = .85
    bright_db, dull_db = fry()
    fizz, crackle = sizzle(bright_db, dull_db)
    spit = limit * np.tanh((spits() + ticks() + pops() + beads()) / limit)
    fizz, crackle, spit = filtered([fizz, crackle, spit], 3, 390, "high")
    around = air() + plate() + drones() + thuds()
    out = np.zeros(N)
    for (start, end), peaks, crackle_db in zip(SHOTS, hollows, crackle_levels):
        part = slice(int(start * SR), int(end * SR))
        crackling = crackle[part] + to_linear_factor(-0.5) * echoed(crackle[part])
        pan = fizz[part] + to_linear_factor(crackle_db) * crackling + to_linear_factor(-7.0) * echoed(spit[part])
        out[part] = around[part] + spit[part] + hollow(pan, peaks)
    return (out + needles(bright_db) + whistle())[None]


def roll_off(x):
    return signal.sosfilt(signal.butter(12, 16820, fs=SR, output="sos"), x)


def record(dry):
    x = signal.sosfilt(signal.ellip(8, .5, 32, 15850, fs=SR, output="sos"), dry)
    x = signal.sosfilt(signal.ellip(8, .5, 40, 16700, fs=SR, output="sos"), x)
    gap_start, gap_end = int(SHOTS[1][1] * SR), int(SHOTS[2][0] * SR)
    x[:, gap_start:gap_end] = 0
    x[:, gap_end:gap_end + 16] *= np.linspace(0, 1, 16)
    return roll_off(x)


dry = scene()
out = record(dry)
unload_wav(out)
```